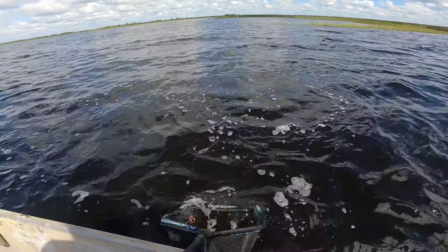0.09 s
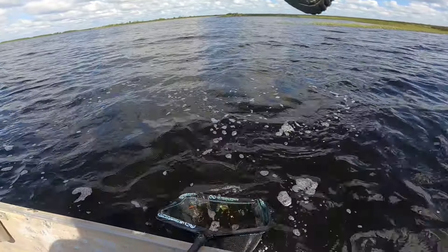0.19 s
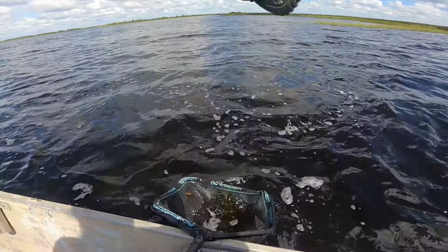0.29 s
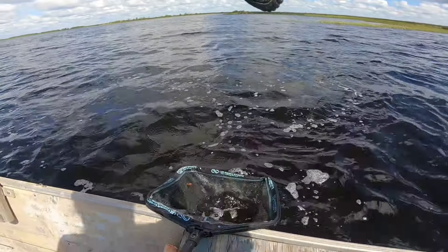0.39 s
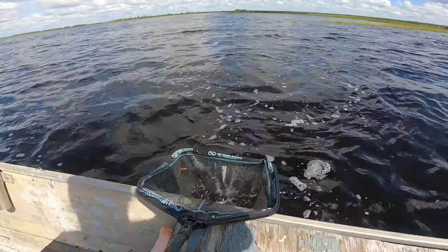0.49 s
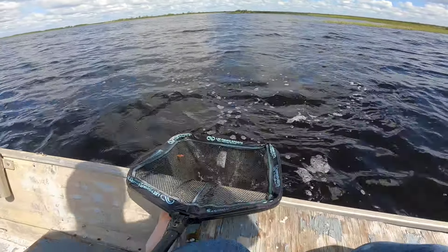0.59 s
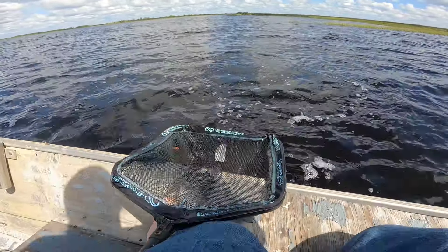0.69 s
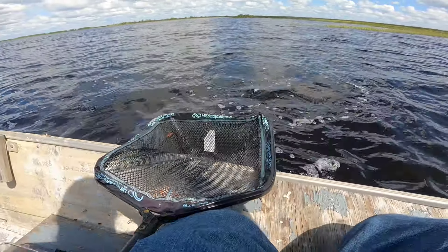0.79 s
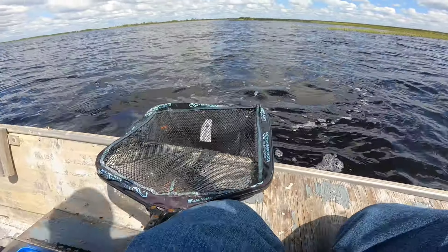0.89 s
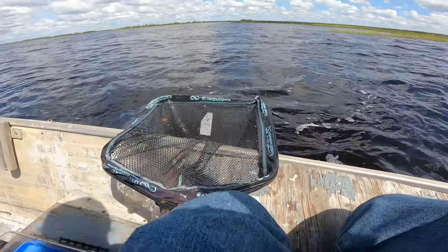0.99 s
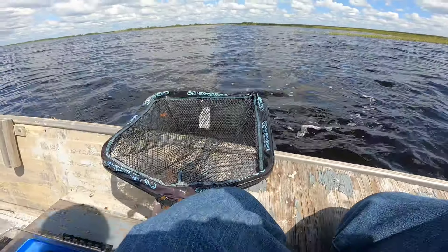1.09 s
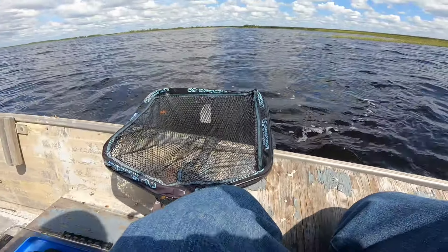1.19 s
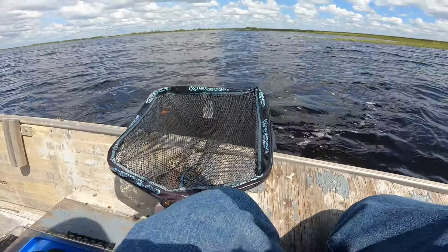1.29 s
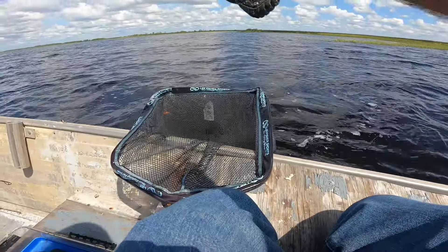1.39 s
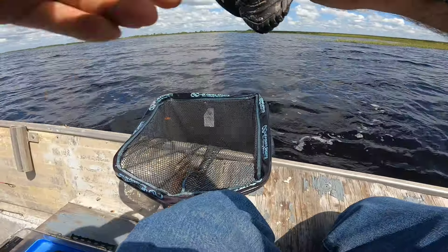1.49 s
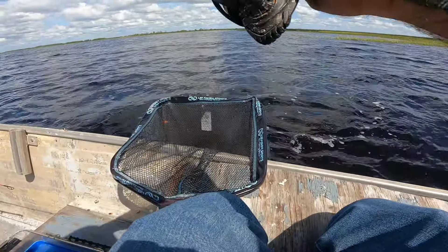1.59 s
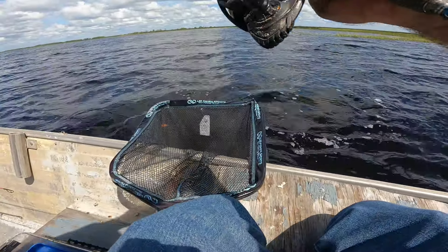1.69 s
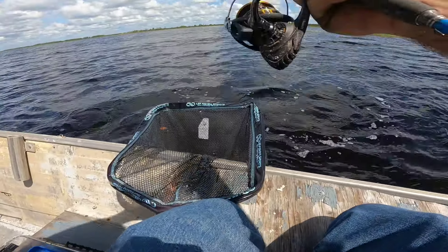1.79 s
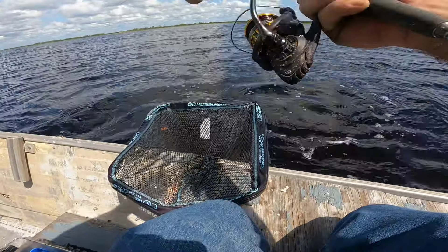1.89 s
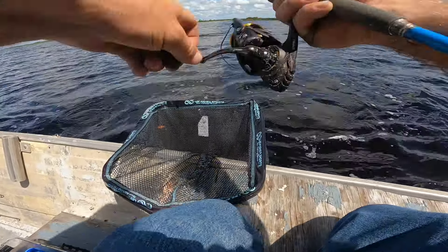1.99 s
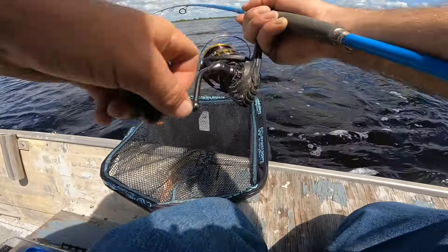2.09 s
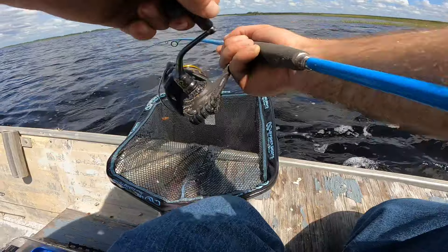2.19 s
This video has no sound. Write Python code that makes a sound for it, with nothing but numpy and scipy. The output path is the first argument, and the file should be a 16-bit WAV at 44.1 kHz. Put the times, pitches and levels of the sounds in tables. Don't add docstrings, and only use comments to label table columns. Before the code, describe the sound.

A landing net is hauled into a small wooden boat, close up. Its handle scrapes and hums on the rail, bumps hard at 0.28 s, then clatters with wet mesh slaps until 0.5 s. Mesh rustles around 0.7 s, with a soft thud at 0.8. Hollow woody drops land at 1.02 and 1.43 s. Reel clicks gather from 1.7 s into whirring winding after 1.9 s. Water and breeze rumble low.

```python
import sys
import numpy as np
from scipy import signal
from scipy.fft import rfft, irfft
from scipy.io import wavfile
from scipy.ndimage import uniform_filter1d, map_coordinates

SR = 44100
rng = np.random.default_rng(int(sys.argv[2]) if len(sys.argv) > 2 else 0)


def makeup_ratio(level_db):
    decades = np.asarray(level_db, float) / 20
    return 10 ** decades


def store_pcm(level_fs):
    pcm = np.round(np.clip(level_fs, -1, 1) * 32767).astype(np.int16)
    wavfile.write(sys.argv[1], SR, np.atleast_2d(pcm).T)


N = 97020
t = np.arange(N) / SR


def unit(x):
    return x / np.sqrt(np.mean(x ** 2))


def curve(rows, axis=1):
    r = np.array(rows)
    return makeup_ratio(np.interp(t, r[:, 0], r[:, axis], -99, -99))


def colour(x, shape, tilt_db=0, patchy_db=0):
    octave = np.log2(np.fft.rfftfreq(len(x), 1 / SR) + 1)
    points = np.array(shape)
    db = np.interp(octave, np.log2(points[:, 0]), points[:, 1], -70, -90)
    db += tilt_db * (octave - np.log2(3000))
    db += patchy_db * np.interp(octave, np.arange(0, 15, .25), rng.standard_normal(60))
    return unit(irfft(rfft(x) * makeup_ratio(db), len(x)))


def walk(rate):
    hold = int(SR / rate)
    steps = np.repeat(rng.standard_normal(N // hold + 1), hold)
    return 1.3 * uniform_filter1d(uniform_filter1d(steps, hold), hold)[:N]


def grains(rate, scatter_db):
    chance, sign, size = rng.random((3, N))
    taps = (chance < rate / SR) * np.sign(sign - .5)
    return unit(taps * makeup_ratio(-scatter_db * np.log(size + 1e-9)))


def ring(x, hz, t60):
    pole = np.exp(2j * np.pi * hz / SR - np.log(1000) / (t60 * SR))
    return signal.lfilter([1], [1, -pole], x).imag


def waver(y, ms, rate):
    return map_coordinates(y, [np.arange(N) + ms * SR / 1000 * walk(rate)], mode="nearest")


def body(force, modes):
    tones = sum((-1) ** k * makeup_ratio(db) * ring(force, hz, t60) for k, (hz, db, t60) in enumerate(modes))
    return waver(tones, 0.15, 60)


def pushes(rows):
    shudder_db, shudder_t60_s = -21.5, 0.26
    force = 1e-18 * np.ones(N)
    jitter = uniform_filter1d(grains(600, 1.8), size=40) / 10
    for s, db, ms in rows:
        u = (t - s) / (ms / 1000)
        force += makeup_ratio(db) * np.sin(np.pi * np.clip(u, 0, 1)) * 1000 / (ms * SR)
        fade = 1000. ** -np.clip((t - s) / shudder_t60_s, 0, 9)
        force += makeup_ratio(db + shudder_db) * jitter * (u > 1) * fade
    return force


# frequency in Hz, level in dB.
WATER_TONE = [(12, -36.5), (20, -0.5), (245, -13.5), (581, -24.5), (1980, -34), (4190, -38.5), (15500, -63)]
# time in seconds, level in dB.
SWELL = [(0, -42.5), (.25, -49), (.5, -35.5), (.68, -50.5), (.95, -43), (1.1, -42.5), (1.28, -48.5),
         (1.4, -55), (1.62, -48.5), (1.72, -43.5), (1.8, -48), (1.9, -46.5), (2., -40.5), (2.1, -47),
         (2.2, -37)]
# start in seconds, peak in dB, length in milliseconds.
BUFFETS = [
    (0.032, -34, 46),
    (1.656, -29.5, 20),
    (1.733, -25.5, 25.5),
    (1.854, -35.5, 10.3),
]


def water():
    base = rfft(colour(rng.standard_normal(N), WATER_TONE))
    octave = np.log2(np.fft.rfftfreq(N, 1 / SR) + 1)
    swell = curve(SWELL)
    out = np.zeros(N)
    for o in range(4, 15):
        band = irfft(base * np.clip(1 - abs(octave - o), 0, 1), N)
        power, db = (1, 3) if o < 8 else (.6, -18)
        out += band * makeup_ratio(2.0 * walk(11.51)) * swell ** power * makeup_ratio(db)
    for s, db, ms in BUFFETS:
        u = np.clip((t - s) / (ms / 1000), 0, 1)
        out -= makeup_ratio(db) * np.sin(2 * np.pi * u) * np.sin(np.pi * u) ** .5
    return out


# time in seconds, level in dB.
RUSTLE = [(.3, -47), (.5, -44.5), (.62, -41.5), (.68, -37), (.79, -37), (.85, -46.5), (.97, -60.5),
          (1.2, -90), (1.32, -59), (1.38, -86)]
# frequency in Hz, level in dB.
NET_TONE = [(88, -38), (150, 3.5), (631, 0), (1020, -5.5), (3280, -10), (15500, -40)]


def rustle():
    return curve(RUSTLE) * makeup_ratio(walk(41.96)) * colour(grains(4000, 0.37), NET_TONE)


# start in seconds, peak in dB, ring in Hz, fade by 60 dB in milliseconds.
CLICKS = [(0.9387, -41, 2980, 25), (1.0253, -24.5, 3512, 33), (1.1403, -33, 2790, 25),
          (1.621, -44.5, 3390, 32), (1.681, -38.5, 4980, 14), (1.6928, -30.5, 2800, 9),
          (1.694, -37.5, 5680, 10), (1.6958, -34, 1770, 15), (1.707, -42, 4900, 9), (1.71, -39, 1810, 28),
          (1.714, -33, 5140, 10), (1.7124, -33, 3910, 17), (1.7274, -24.5, 2390, 8.9),
          (1.7273, -38, 3950, 12), (1.7255, -46, 5500, 10), (1.771, -51, 7100, 6.3), (1.786, -47, 4100, 14),
          (1.8543, -29, 2050, 8.1), (1.8534, -30.5, 2800, 6.3), (1.891, -24.5, 2760, 9.4),
          (1.891, -42, 4560, 13), (1.906, -28, 2750, 14), (1.9168, -31.5, 2800, 33),
          (1.9265, -22.5, 2670, 32), (1.938, -33, 2800, 13), (1.946, -30.5, 2800, 16),
          (1.9602, -30, 2780, 20), (1.9824, -34, 3900, 20), (1.993, -37, 2800, 25),
          (2.0208, -25.5, 3820, 24), (2.032, -18, 3090, 8.8), (2.0323, -21, 4160, 8),
          (2.0323, -28.5, 7600, 7.5), (2.059, -35, 4700, 18), (2.06, -39.5, 9100, 25),
          (2.06, -41, 7200, 12), (2.073, -41.5, 2800, 20), (2.12, -42.5, 9100, 15),
          (2.151, -30.5, 2940, 8.5), (2.1716, -32, 3000, 10)]


def reel_clicks():
    out = np.zeros(N)
    for s, db, hz, ms in CLICKS:
        start, fade_s = int(s * SR), ms / 1000
        u = np.clip(t[start:start + 1200] - s, 0, 1)
        env = (1 - np.exp(-u / (0.03 * fade_s))) * 1000. ** (-u / fade_s)
        noise = rng.standard_normal(1200)[:len(u)]
        tone = unit(ring(noise, hz, 6.3 / hz)) * 0.49 + np.sin(2 * np.pi * hz * u)
        air = makeup_ratio(-23) * uniform_filter1d(noise, size=3)
        out[start:start + len(u)] += makeup_ratio(db) * env * (tone + air)
    return out


# time in seconds, whirr level in dB, housing ring level in dB.
WIND_IN = [(1.885, -57, -54), (1.9, -47, -46.5), (1.97, -42, -44), (2.05, -39.5, -46.5), (2.13, -43, -50),
           (2.2, -38.5, -46)]
# frequency in Hz, level in dB.
GEAR_TONE = [(300, -8), (950, -16.5), (1900, -8), (3000, -5), (5500, -14.5), (6500, -29.5), (9000, -20),
             (15500, -38.5)]


def reel_winding():
    gear_hz, gear_width_hz = 2790, 180
    teeth = grains(500, 2.8)
    housing = ring(teeth, gear_hz, 4.7 / gear_width_hz)
    housing += makeup_ratio(-12.5) * ring(teeth, 4700, 0.022) + makeup_ratio(-12) * ring(teeth, 3750, 0.0073)
    housing = unit(waver(housing, 0.086, 40))
    whirr = sum(makeup_ratio(1.7 * walk(70)) * colour(grains(1500, 2.45), GEAR_TONE, 0, 2) for _ in range(3)) / 2
    return curve(WIND_IN) * whirr + curve(WIND_IN, axis=2) * housing


# peak time in seconds, level in dB, rise in milliseconds,
# fade by 60 dB in milliseconds, brightness in dB per octave.
SLAPS = [(0.017, -36.5, 5.5, 70, 11.5), (0.258, -28.5, 2.6, 94, -6), (0.275, -26.5, 2, 86, -1.5),
         (0.363, -22.5, 0.66, 220, -4), (0.393, -23.5, 8.2, 119, 3), (0.459, -20.5, 5.3, 89, 4),
         (0.81, -31, 3.3, 62, 4.5), (0.978, -36, 1, 95, -12), (1.028, -21.5, 6.1, 84, 3),
         (1.431, -30, 4.6, 280, 0), (1.467, -28, 1, 112, 4)]
# frequency in Hz, level in dB.
MESH_TONE = [(410, 3), (700, 0), (1710, -10), (3320, -16), (4640, -25.5), (5710, -23.5), (15500, -58)]


def slaps():
    out = np.zeros(N)
    for s, db, rise, fall, tilt in SLAPS:
        u = (t - s) * 1000
        swelling = np.exp(np.clip(u / rise, -50, 0))
        dying = 1000. ** -np.clip(u / fall, 0, 9)
        env = np.where(u < 0, swelling, dying)
        out += makeup_ratio(db) * env * colour(grains(5000, 1.5), MESH_TONE, tilt, 2)
    return out


# frequency in Hz, level in dB, fade by 60 dB in seconds.
HOOP = [(435.5, -0.5, 0.15), (628.4, -3, 0.18), (928.5, -5.5, 0.2), (1061, -4.5, 0.065), (1428, -9, 0.051),
        (1900, -23, .08), (2170, -26, 0.097), (3430, -13, .05)]
# start in seconds, strength in dB, contact in milliseconds.
HOOP_KNOCKS = [(.363, -31, 0.23), (.375, -28, 0.65), (.384, -18.5, 0.97), (.394, -21, 0.12),
               (.405, -13.5, 0.9), (.457, -26, 0.18), (.463, -29, 0.067), (.48, -30, 0.15),
               (.977, -42, 0.33), (.988, -46, .5), (1.022, -27.5, 0.24), (1.43, -22.5, 0.22),
               (1.466, -33.5, 0.32)]


def hoop_bumps():
    return body(pushes(HOOP_KNOCKS), HOOP)


# frequency in Hz, level in dB, fade by 60 dB in seconds.
SEAT = [(80.4, -9, 0.38), (110.5, -10.5, 0.4), (163.8, 2.5, 0.16), (199, -3, 0.17), (247.8, 1, 0.15),
        (301, -2, 0.095), (384, 2.5, 0.044), (515, -15, 0.24), (785, -33, 0.048), (951, -0.5, 0.047)]
# start in seconds, strength in dB, contact in milliseconds.
SEAT_KNOCKS = [
    (.797, -13, 7),
    (.812, -59, 4.5),
    (.828, -39, 0.27),
    (1.429, -16, 0.78),
    (1.4385, -8.5, 1.8),
    (1.466, -33.5, 2.5),
    (1.485, -16.5, 1.18),
    (1.55, -33, 1.7),
]


def seat_bumps():
    return body(pushes(SEAT_KNOCKS), SEAT)


# frequency in Hz, level in dB, fade by 60 dB in seconds.
DECK = [(65, -10.5, 0.55), (134.8, -6, 0.18), (160, 2, 0.14), (195, 5, 0.093), (242, -4, 0.28),
        (287, -2.5, 0.17), (386.5, 2, 0.092), (524.7, -11, 0.15), (650, -15.5, 0.072), (895, 0.5, 0.034)]
# start in seconds, strength in dB, contact in milliseconds.
DECK_KNOCKS = [
    (1.021, -57, 0.28),
    (1.0245, -8.5, 1.18),
    (1.033, -12.5, 4.3),
    (1.056, -28, 1.5),
    (1.076, -30.5, 1.8),
    (1.09, -35.5, 1.3),
    (1.17, -43, 8.6),
    (1.25, -47.5, 7.5),
]


def deck_bumps():
    return body(pushes(DECK_KNOCKS), DECK)


# start in seconds, strength in dB, contact in milliseconds.
RAIL_KNOCKS = [
    (.2775, -3, 0.61),
    (.2885, 1, 3.03),
    (.328, -27, 2.2),
    (.363, -16.5, 0.19),
    (.3765, -9, 1.3),
    (.385, -13.5, 0.47),
    (.394, -9.5, 2),
    (.405, -15, 0.54),
    (.457, -27, .4),
    (.481, -38, 0.55),
]
# frequency in Hz, level in dB,
# fade by 60 dB in seconds.
RAIL = [(122, -11.5, 0.19), (151.1, -14, 0.47), (237.3, 1.5, 0.082), (308, -3.5, 0.082), (366, -5, 0.097),
        (449, 2, 0.06), (532.5, -3.5, 0.074), (629, -4, 0.1), (758, -7, 0.039), (946, -9.5, 0.054)]


def rail_bumps():
    return body(pushes(RAIL_KNOCKS), RAIL)


# time in seconds, wood level in dB, tube level in dB.
DRAG = [(0, -36, -32), (.06, -35.5, -31), (.17, -35, -30.5), (.26, -36, -29.5), (.29, -38, -33),
        (.33, -31, -42.5), (.4, -27, -59), (.5, -28.5, -40.5), (.62, -62, -85)]
# frequency in Hz, width in Hz, level in dB.
HANDLE = [(416, 51, 1), (582, 62, -0.5), (840, 170, -6), (1034, 60, 1.5), (1410, 170, -2),
          (1757, 210, -10.5), (1970, 110, -22.5), (2800, 2000, -14), (3930, 1400, -21), (6230, 170, -22),
          (7600, 670, -18.5)]


def drag():
    slips = grains(1800, 3.5) * makeup_ratio(1.65 * walk(26.1))
    wood = unit(body(slips, RAIL))
    tube = np.zeros(N)
    for hz, width, db in HANDLE:
        tone = unit(ring(grains(6000, 1.6), hz, 2.97 / width))
        tube += makeup_ratio(db + 4.1 * walk(24.7)) * waver(tone, 1.3, 11)
    groan_start_s, groan_end_s, groan_hz = .175, 0.3, 248
    load = np.sin(np.pi * np.clip((t - groan_start_s) / (groan_end_s - groan_start_s), 0, 1)) ** .5
    hum = unit(ring(ring(rng.standard_normal(N), groan_hz, 0.13), groan_hz, 0.12))
    return curve(DRAG) * wood + curve(DRAG, axis=2) * unit(tube) + makeup_ratio(-29.5) * load * hum


def scene():
    mid = water() + rustle() + reel_clicks() + reel_winding() + slaps()
    mid += hoop_bumps() + seat_bumps() + deck_bumps() + rail_bumps() + drag()

    def high(hz):
        return signal.sosfilt(signal.butter(6, hz, "high", fs=SR, output="sos"), mid)

    side = np.roll(high(1250), 23) * makeup_ratio(-53 + 45.5 * np.exp(-t / 0.79))
    scatter = np.sin(8 * walk(300))
    side += high(11000) * (scatter + .2) * makeup_ratio(2)
    deep = signal.butter(2, 40, fs=SR, output="sos")
    side += makeup_ratio(-19) * signal.sosfilt(deep, np.roll(mid, 700))
    return np.array([mid + side, mid - side])


def band_limit(x):
    return signal.sosfilt(signal.butter(12, 15690, fs=SR, output="sos"), x)


# frequency in Hz, level in dB.
MIC = [(8000, 0), (9500, -6), (15500, -9.5)]


def record(dry):
    x = signal.sosfilt(signal.butter(2, 35, "high", fs=SR, output="sos"), dry)
    housing_db = np.interp(np.fft.rfftfreq(N, 1 / SR), *np.array(MIC).T)
    x = np.tanh(irfft(rfft(x) * makeup_ratio(housing_db), N))
    x = signal.sosfilt(signal.ellip(6, .2, 50, 15400, fs=SR, output="sos"), x)
    return band_limit(x)


dry = scene()
out = record(dry)
store_pcm(out)
```